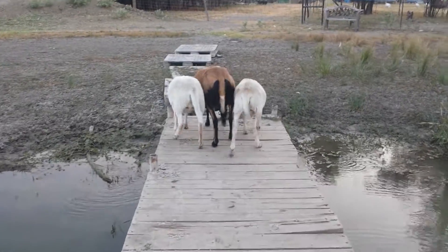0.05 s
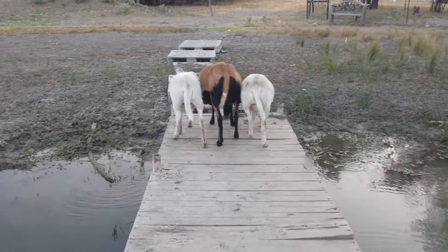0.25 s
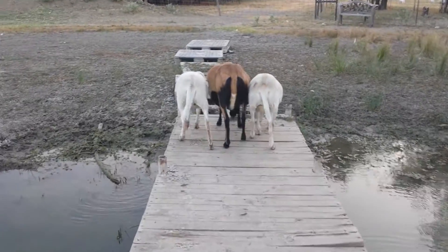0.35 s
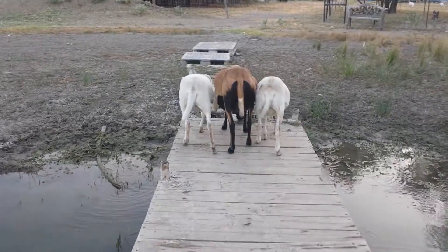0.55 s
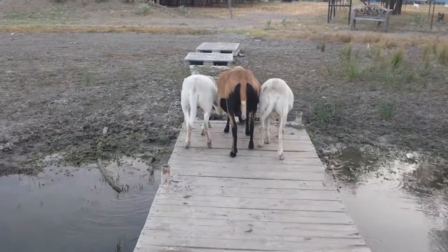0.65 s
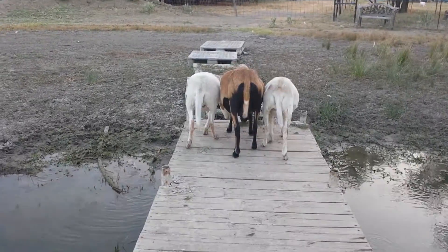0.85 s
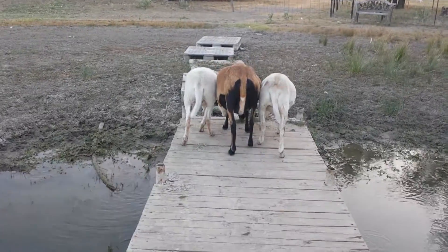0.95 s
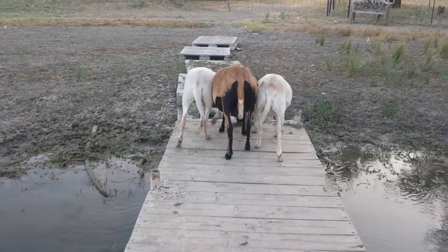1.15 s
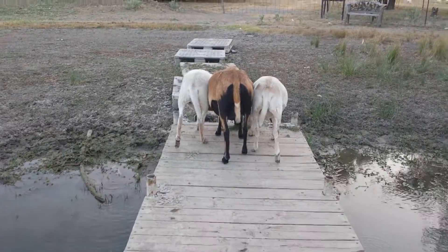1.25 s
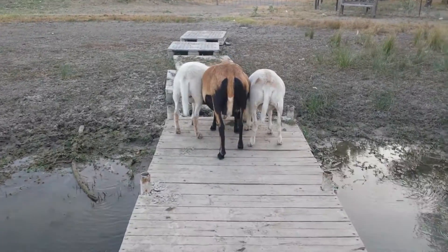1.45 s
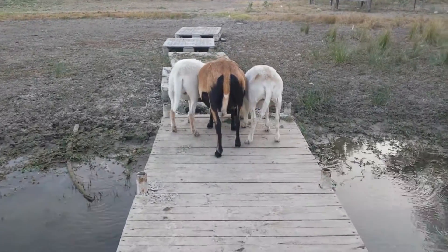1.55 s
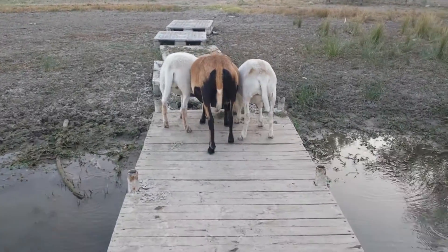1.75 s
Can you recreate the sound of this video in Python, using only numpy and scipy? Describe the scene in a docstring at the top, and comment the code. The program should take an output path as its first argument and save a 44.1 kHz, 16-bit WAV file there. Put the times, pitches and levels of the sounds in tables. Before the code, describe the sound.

Sheep hooves thud, knock and scuff unevenly on the planks of a wooden pier. Early on, two sharp pops hit the left microphone, the second much louder. A bright hoof clack comes near the end, over quiet outdoor air.

```python
"""Three sheep walk away along a plank pier over still water. Each hoof is an impact that excites
damped modes: the deck thuds, the plank knocks, and a hard landing adds a bright clack.
Friction gives gritty scuffs and one tiny squeak, and a loose board taps its joist.
Two sharp pops, step responses of a bass filter, strike the left microphone alone.
Behind them lie quiet outdoor air, hiss and a faint, fast-pulsing whine on the left."""
import sys
import numpy as np
from scipy import signal
from scipy.fft import rfft, irfft, next_fast_len
from scipy.io import wavfile

SR = 44100
rng = np.random.default_rng(int(sys.argv[2]) if len(sys.argv) > 2 else 0)


def digitize_waveform(pressure):
    """Quantize a signal to 16-bit integers and store it at the path in sys.argv[1].

    Rows of a 2-D input are taken as channels; values are limited to [-1, 1].
    """
    field = np.atleast_2d(pressure).T
    bounded = np.clip(field, -1, 1)
    quanta = np.round(bounded * 32767).astype(np.int16)
    wavfile.write(sys.argv[1], SR, quanta)


N = 79380

# Background spectra before their gain curves: frequency_hz, density_db_per_hz
AIR_SPECTRUM = [(25, -104), (60, -99), (100, -90.5), (160, -81), (300, -90), (480, -94.5), (680, -89),
                (880, -93.5), (1200, -104), (3000, -116), (9000, -135)]
LEFT_HISS_SPECTRUM = [(30, -101), (300, -97), (850, -95), (1300, -99), (2800, -102), (3300, -100),
                      (3620, -101), (4100, -101), (5400, -95.5), (6400, -99), (7200, -103), (10000, -110),
                      (15500, -111)]
RIGHT_HISS_SPECTRUM = [(30, -103), (300, -102), (850, -100.5), (1300, -103), (2700, -103), (3500, -100),
                       (5000, -103), (6500, -106), (10000, -107), (13500, -106), (15500, -102)]
# Gain curves of the background: time_s, gain_db
AIR_GAIN = [(0, -4), (.6, -1.5), (.75, 1.5), (1.05, -1.5), (1.4, 1.5), (1.62, -0.5), (1.8, -11)]
HISS_GAIN = [(0, 4.5), (.14, -3), (.4, 4), (.6, -2.5), (.75, 0.5), (1.05, -2.5), (1.3, 2.5), (1.42, -0.5),
             (1.6, 3), (1.72, -4), (1.8, -6)]
WHINE_GAIN = [(0, -59.5), (.5, -59), (.7, -59.5), (1.4, -55), (1.65, -58), (1.8, -66.5)]
# Pops in the left microphone: start_s, peak_db
MICROPHONE_POPS = [(.30437, -14.5), (0.3927, -1.54)]
# Hooves scraping gritty wood: start_s, level_db, centre_hz, t60_s
HOOF_SCUFFS = [(0.071, -57, 5500, 0.0077), (0.185, -51, 1600, 0.11), (0.211, -51.5, 1670, 0.16),
               (0.355, -52, 3240, 0.038), (0.416, -55, 4000, 0.049), (0.556, -59, 2500, 0.052),
               (0.854, -46.5, 3960, 0.072), (1.155, -49, 2170, 0.052), (1.157, -52, 5570, 0.18),
               (1.301, -68, 8240, 0.25), (1.444, -51.5, 13800, 0.099), (1.4858, -36, 5350, 0.028)]
# Modes of the loose board: frequency_hz, relative_db, t60_s
LOOSE_BOARD_MODES = [(586, 2.5, 0.021), (698, -11, 0.03)]
# Modes of the deck: ratio_to_thud_pitch, relative_db, share_of_thud_t60
DECK_MODES = [(1, 3, 0.7), (.76, -19, 1), (1.3, -8, 0.46), (1.72, -13.5, 0.87), (2.1, -18.5, 0.61)]
# Modes of a plank: base_hz, relative_db
PLANK_MODES = [(290, -5.5), (345, -1.5), (445, -1), (485, -2), (600, -5), (660, -2), (770, -12)]
# Modes of hard hoof on wood: base_hz, relative_db, t60_s
CLACK_MODES = [(1093, -7.5, .1), (1176, -6, 0.12), (1606, 1, 0.04), (1679, -1.5, 0.093), (1756, -2, 0.084),
               (2180, -5, 0.053), (2283, -2.5, 0.11), (2560, -13, 0.086), (2963, -17.5, 0.17),
               (3400, -9, .07), (3900, -15, 0.065), (4170, -18, 0.031), (4930, -6, 0.033)]
# Spectra of the dense ringing between the modes: frequency_hz, relative_db
THUD_SPECTRUM = [(30, -45), (80, -37), (112, -3), (260, -10.5), (400, -21.5), (900, -47), (3000, -92)]
KNOCK_SPECTRUM = [(80, -69), (250, 0.5), (450, 3.5), (700, -3), (1000, -10.5), (1600, -12.5), (6000, -83)]
CLACK_SPECTRUM = [(200, -39), (550, 2.5), (1150, 7), (1380, -8.5), (1680, 1), (1920, -4.5), (2260, 1.5),
                  (2700, -11), (5300, -9.5), (8500, -35.5), (11000, -27), (15500, -29)]
# Hoof impacts: start_s, thud_db, thud_pitch_hz, thud_t60_s, knock_db, knock_t60_s, clack_db,
# plank_pitch_ratio (multiplies base_hz of the plank and clack modes)
HOOF_FALLS = [(0.0, -42, 152.2, 0.35, -57.5, 0.16, -93, 1.2),
              (0.179, -44.5, 229, 0.11, -43.5, 0.22, -47.5, .84),
              (0.204, -31.5, 161.7, 0.15, -41.5, 0.095, -51, 0.86),
              (0.224, -35.5, 125.4, 0.22, -43, 0.17, -56.5, .95),
              (0.258, -45, 154.4, 1, -61, 0.081, -70, 1.4), (0.415, -41, 250, 0.13, -48, 0.12, -51.5, 1.12),
              (0.446, -41.5, 258, 0.13, -56, 0.29, -58, 0.93),
              (0.455, -50, 118.7, 0.64, -74, 0.11, -73, 0.81),
              (0.486, -48.5, 240, 0.12, -50, 0.072, -61.5, 1.03),
              (0.650, -39, 152, 0.17, -52, 0.19, -66, 0.87),
              (0.722, -47, 184.4, 0.16, -60.5, 0.11, -66.5, 1.1),
              (0.853, -49, 151.4, 0.33, -40, 0.087, -40, 0.97),
              (0.891, -51.5, 152, 0.21, -55, 0.36, -56, 1.1),
              (1.111, -44.5, 182, 0.11, -56.5, 0.23, -64.5, 1.43),
              (1.154, -41.5, 132.8, 0.36, -59, 0.065, -49.5, 1),
              (1.182, -45, 180.2, 0.4, -52.5, 0.2, -52.5, 0.82),
              (1.271, -49.5, 202, .2, -67, 0.13, -57.5, 1.05), (1.290, -41, 185, 0.15, -50, 0.11, -58, .9),
              (1.296, -32.5, 171.6, 0.15, -69, 0.26, -67, 0.78),
              (1.344, -50.5, 177, 0.47, -59, 0.24, -93, 1),
              (1.4855, -39, 200, 0.23, -36, 0.25, -31.5, 0.95),
              (1.522, -36.5, 145.6, 0.45, -48, 0.4, -74, 1)]


def amp(db):
    """Amplitude ratio of a level in decibels."""
    return 10 ** (np.asarray(db) / 20)


def panned(db, pan_db):
    """Interchannel level difference: pan_db is added on the left and subtracted on the right."""
    return amp(db + pan_db * np.array([[1], [-1]]))


def unit(x):
    """Normalisation to rms 1."""
    return x / np.sqrt(np.mean(x ** 2) + 1e-20)


def bell(offset, width):
    """Gaussian curve of peak 1 and standard deviation width."""
    return np.exp(-.5 * (offset / width) ** 2)


def level(points):
    """Gain per sample by interpolation of (time_s, gain_db) points."""
    return amp(np.interp(np.arange(N) / SR, *np.transpose(points)))


def filtered(x, response):
    """Linear filtering: the spectrum of x is multiplied by a frequency response."""
    size = next_fast_len(N + SR // 10)
    return irfft(rfft(x, size) * response(np.fft.rfftfreq(size, 1 / SR)), size)[..., :N]


def noise(spectrum):
    """Spectral shaping of white noise to (frequency_hz, density_db_per_hz) points."""
    hz, db = np.transpose(spectrum)
    white = rng.standard_normal(N) * np.sqrt(SR / 2)
    return filtered(white, lambda f: amp(np.interp(np.log(f + 1), np.log(hz), db)))


def band(hz, width_hz):
    """Band-limited noise of rms 1."""
    return unit(filtered(rng.standard_normal(N), lambda f: bell(f - hz, width_hz)))


def wide(spectrum, side_db):
    """Partly correlated stereo noise of rms 1, from the sum and difference of mid and side."""
    mid, side = noise(spectrum), amp(side_db) * noise(spectrum)
    return unit(np.array([mid + side, mid - side]))


def fade(t, rise_s, t60_s):
    """Exponential damping after a quick rise: 60 dB of decay in t60_s."""
    return (1 - np.exp(-t / rise_s)) * amp(-60 * t / t60_s)


def ring(t, modes, rise_s, spread_rad):
    """Modal superposition in stereo; every blow weights the damped modes a little differently."""
    out = np.zeros((2, len(t)))
    for k, (hz, db, t60_s) in enumerate(modes):
        phase = k * np.pi + spread_rad * rng.standard_normal((2, 1))
        out += amp(db + rng.normal(0, 1)) * np.sin(2 * np.pi * hz * t + phase) * fade(t, rise_s, t60_s)
    return out / np.sqrt(sum(amp(db) ** 2 for _, db, _ in modes) / 2)


def add(out, start_s, x):
    """Superposition of x on out from start_s."""
    start = round(start_s * SR)
    part = x[..., :N - start]
    out[..., start:start + part.shape[-1]] += part


def air_and_hiss():
    """Distant air is coherent at the two microphones; the self-noise of each is independent."""
    air = level(AIR_GAIN) * noise(AIR_SPECTRUM)
    hiss = level(HISS_GAIN) * np.array([noise(LEFT_HISS_SPECTRUM), noise(RIGHT_HISS_SPECTRUM)])
    return air + hiss


def whine(rate_hz=30):
    """Amplitude modulation on the left, perhaps a lens drive: a broader rasp follows each thin pip."""
    def pulses(centre_s, width_s):
        cycles = (np.arange(N) / SR - centre_s) * rate_hz
        offset_s = ((cycles + .5) % 1 - .5) / rate_hz
        return bell(offset_s, width_s)
    pips = band(hz=6200, width_hz=300) * pulses(centre_s=.025, width_s=.0023)
    rasp = amp(-2.5) * band(hz=4630, width_hz=1250) * pulses(centre_s=.037, width_s=.0042)
    return np.array([level(WHINE_GAIN) * (pips + rasp), np.zeros(N)])


def pops(highpass_hz=98, damping_ratio=.67):
    """Step response: the left microphone's underdamped bass filter pulls a sudden jump back to zero."""
    out, t = np.zeros((2, N)), np.arange(SR // 10) / SR
    omega, angle = 2 * np.pi * highpass_hz, np.arcsin(damping_ratio)
    oscillation = np.cos(omega * np.cos(angle) * t + angle) / np.cos(angle)
    decay = np.exp(-omega * damping_ratio * t)
    for start_s, peak_db in MICROPHONE_POPS:
        add(out[0], start_s, amp(peak_db) * oscillation * decay)
    return out


def squeak():
    """Sliding friction: a hoof slips with a brief narrow-band squeak, mostly on the left."""
    swell = bell(np.arange(N) / SR - .381, width=.005)
    return amp([[-48], [-72]]) * band(hz=5200, width_hz=180) * swell


def scuffs(width_octaves=.4, grain_samples=64):
    """Friction of horn on grit makes short bursts of grainy noise."""
    out, t = np.zeros((2, N)), np.arange(SR // 4) / SR
    for start_s, db, centre_hz, t60_s in HOOF_SCUFFS:
        white = rng.standard_normal((2, N))
        grains = white * amp(np.repeat(rng.standard_normal(N), grain_samples)[:N])
        grit = unit(filtered(grains, lambda f: bell(np.log2((f + 1) / centre_hz), width_octaves)))
        scrape = grit[:, :len(t)] * fade(t, rise_s=.001, t60_s=t60_s)
        add(out, start_s, panned(db, pan_db=1) * scrape)
    return out


def loose_board():
    """A loose board taps its joist; heavy damping leaves one short, hollow tock."""
    out, t = np.zeros((2, N)), np.arange(SR // 10) / SR
    tock = ring(t, LOOSE_BOARD_MODES, rise_s=.0015, spread_rad=.1)
    add(out, start_s=1.182, x=amp(-28) * tock)
    return out


def deck_thud(t, dense, pitch_hz, t60_s, rise_s=.003):
    """Free vibration of the deck: low modes, with noise for the dense ringing between them."""
    modes = [(pitch_hz * ratio, db, t60_s * share) for ratio, db, share in DECK_MODES]
    return ring(t, modes, rise_s, spread_rad=.087) + amp(-9) * dense * fade(t, rise_s, t60_s)


def plank_knock(t, dense, pitch_ratio, t60_s, rise_s=.0015):
    """Resonance of the struck plank: midrange modes and dense ringing share one decay time."""
    modes = [(hz * pitch_ratio, db, t60_s) for hz, db in PLANK_MODES]
    return ring(t, modes, rise_s, spread_rad=.33) + amp(-4.5) * dense * fade(t, rise_s, t60_s)


def hoof_clack(t, dense, pitch_ratio, rise_s=.0004):
    """Brief, hard contact excites high modes and dense ringing that decays in three stages."""
    modes = [(hz * pitch_ratio, db, t60_s) for hz, db, t60_s in CLACK_MODES]
    crack = amp(-1) * fade(t, rise_s, t60_s=.01)
    body = amp(-4) * fade(t, rise_s, t60_s=.11)
    tail = amp(-21) * fade(t, rise_s, t60_s=.38)
    return ring(t, modes, rise_s, spread_rad=.81) + dense * (crack + body + tail)


def hooves(bass_cut_hz=60):
    """Impact excitation: each hoof thuds, knocks and clacks; a bass filter trims the deepest rumble."""
    out, t = np.zeros((2, N)), np.arange(SR // 2) / SR
    dense = (wide(THUD_SPECTRUM, side_db=-22), wide(KNOCK_SPECTRUM, side_db=-29),
             wide(CLACK_SPECTRUM, side_db=-5.5))
    for start_s, thud_db, thud_hz, thud_t60_s, knock_db, knock_t60_s, clack_db, ratio in HOOF_FALLS:
        offset = int(rng.random() * (N - len(t)))  # each blow takes a random stretch of the noise
        low, mid, high = (layer[:, offset:offset + len(t)] for layer in dense)
        thud = amp(thud_db) * deck_thud(t, low, thud_hz, thud_t60_s)
        knock = panned(knock_db, pan_db=-.35) * plank_knock(t, mid, ratio, knock_t60_s)
        clack = panned(clack_db, pan_db=1.5) * hoof_clack(t, high, ratio)
        add(out, start_s, thud + knock + clack)
    return signal.sosfilt(signal.butter(3, bass_cut_hz, btype="high", fs=SR, output="sos"), out)


def scene():
    """Linear superposition of all sources at the two microphones."""
    return hooves() + loose_board() + scuffs() + squeak() + pops() + air_and_hiss() + whine()


def record(dry, cutoff_hz=15700):
    """Band limiting: a steep low-pass filter removes the highest treble."""
    return filtered(dry, lambda hz: 1 / np.sqrt(1 + (hz / cutoff_hz) ** 120))


dry = scene()
out = record(dry)
digitize_waveform(out)
```